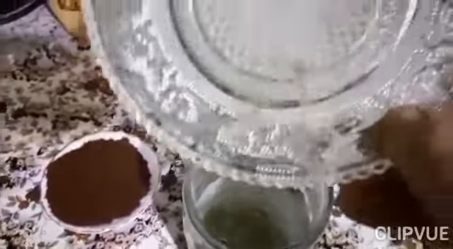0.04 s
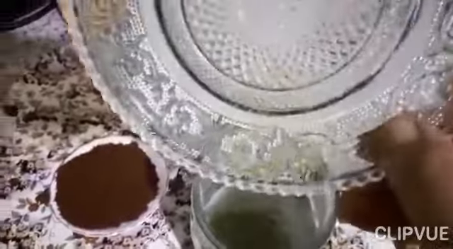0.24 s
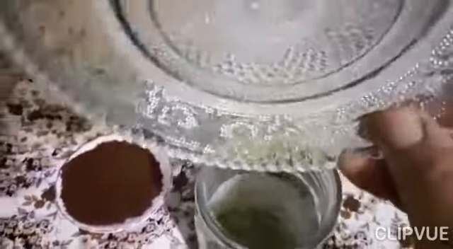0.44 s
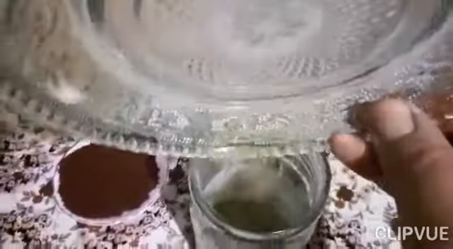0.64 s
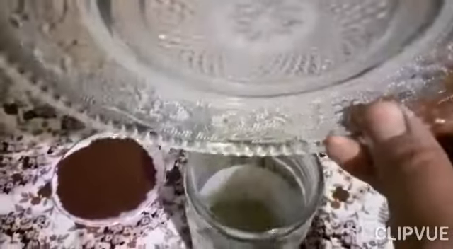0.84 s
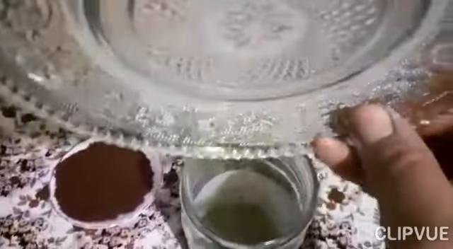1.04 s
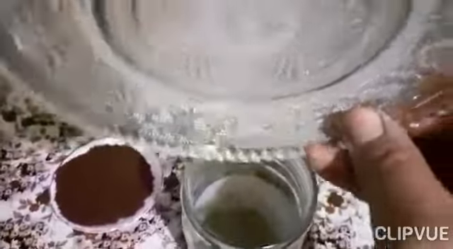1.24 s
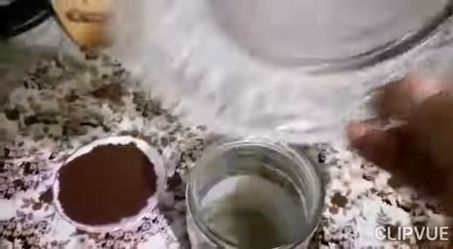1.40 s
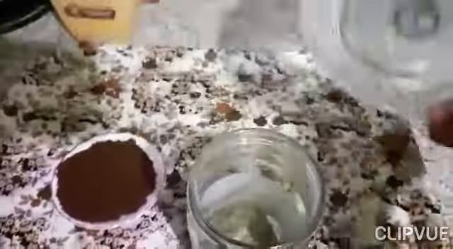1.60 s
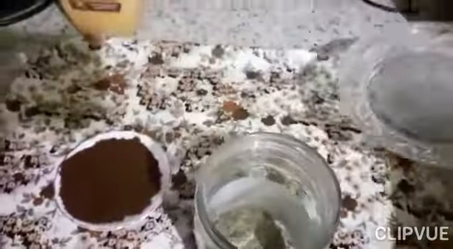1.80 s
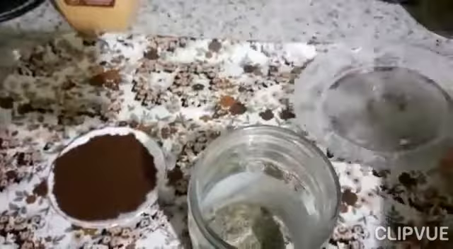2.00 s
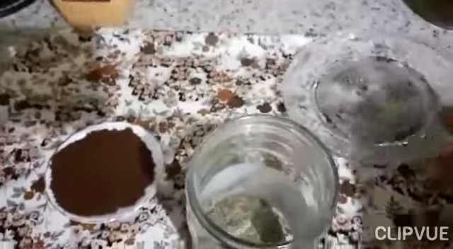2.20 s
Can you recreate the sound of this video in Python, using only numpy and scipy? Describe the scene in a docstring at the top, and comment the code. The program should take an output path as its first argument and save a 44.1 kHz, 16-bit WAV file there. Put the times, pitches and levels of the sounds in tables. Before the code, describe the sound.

Glass lid clinking on a glass jar, close up in a small kitchen with short echo. A sharp knock at 0.17 s, small taps until 0.47, then strong bouncing clinks near 0.64, 0.82, 0.95, 1.14 and 1.33, the last ringing on briefly. Faint hiss near 1.27, then almost quiet with tiny puffs. At 2.1 the lid lands on stone with a dull clack and settles.

```python
"""Glass lid on a jar

A hand-held glass lid knocks, often bouncing, on the rim of an open glass jar in a small kitchen; then it is
set down on a stone counter with a dull clack. Glass is decaying sine modes; cracks, thuds and clack are noise
bursts. Two tones ring on as the lid springs clear. Faint swells of band noise lie between the blows, over a
faint background noise."""
import sys
import numpy as np
from scipy import signal
from scipy.fft import irfft
from scipy.io import wavfile

SR = 44100
rng = np.random.default_rng(int(sys.argv[2]) if len(sys.argv) > 2 else 0)


def log_audio(samples):
    """Write samples as a 16-bit WAV file to the path given in sys.argv[1]."""
    # one column per channel
    frames = np.atleast_2d(samples).T
    # limit to full scale, then quantise
    limited = np.clip(frames, -1, 1)
    pcm = np.round(limited * 32767).astype(np.int16)
    wavfile.write(sys.argv[1], SR, pcm)


N = 99269
T = np.arange(N) / SR


def from_db(db):
    """Decibels to amplitude gain."""
    return 10 ** (np.asarray(db) / 20)


def at_hz(points, hz):
    """Interpolate a (freq_hz, value) table on a log-frequency axis."""
    freq_hz, value = np.transpose(points)
    return np.interp(np.log(np.maximum(hz, 1)), np.log(freq_hz), value)


def pan(left_minus_right_db):
    """Left and right gains of constant total power."""
    gains = from_db(np.array([left_minus_right_db, -left_minus_right_db]) / 2)
    return gains / np.sqrt(np.mean(gains ** 2, axis=0))


# likeness of the two ears' noise: freq_hz, correlation [-1..1]
EAR_LIKENESS = [(50, 0.8), (250, 0.99), (700, .75), (1300, 0.11), (3000, 0), (12000, 0)]


def noise(spectrum, balance):
    """Stereo noise of rms 1: random phases under a set colour, alike in both ears in the bass."""
    hz = np.arange(N // 2 + 1) * SR / N
    mid, side = np.exp(2j * np.pi * rng.random((2, len(hz))))
    alike = np.clip(at_hz(EAR_LIKENESS, hz), -1, 1)
    both = np.sqrt(1 + alike) * mid + np.sqrt(1 - alike) * side * [[1], [-1]]
    colour = from_db(at_hz(spectrum, hz)) * (hz > 20)
    x = irfft(both * colour * pan(at_hz(balance, hz)), N)
    return x / x.std()


def decay(start_s, t60_s, rise_s=1e-5):
    """Envelope: exponential rise towards 1 times a decay of 60 dB per t60."""
    age_s = np.maximum(T - start_s, 0)
    rise = 1 - np.exp(-age_s / rise_s)
    return rise * from_db(-60 * np.minimum(age_s / t60_s, 10))


# echo decay time: freq_hz, t60_s
ECHO_T60 = [(100, 0.6), (600, 0.34), (5000, 0.42), (13000, 0.3)]
# echo colour: freq_hz, level_db
ECHO_COLOUR = [(160, 4.5), (220, -4), (320, 3.5), (600, 2), (2000, -0.5), (5000, -6), (13000, -0.5)]
# echo balance: freq_hz, left_minus_right_db
ECHO_BALANCE = [(200, -0.5), (1500, -3.5), (3000, -5.5), (6000, 4.5), (12000, -3)]
ECHO_BUILD_S = 0.002


def kitchen():
    """Diffuse room echo: noise that builds up, then dies octave by octave at its own rate."""
    rest = noise(ECHO_COLOUR, ECHO_BALANCE)
    echo = 0
    for hz in 125 * 2 ** np.arange(8):
        low_pass = signal.butter(2, hz * 1.3, fs=SR, output="sos")
        band = signal.sosfiltfilt(low_pass, rest)
        rest = rest - band
        echo = echo + band * decay(0, at_hz(ECHO_T60, hz))
    echo = echo * (1 - np.exp(-T / ECHO_BUILD_S))
    return echo[:, :SR * 3 // 4]


def in_room(x, echo, wet_db):
    """Add the echo at a set level relative to the direct sound's rms."""
    wet = signal.fftconvolve(x, echo, axes=1)[:, :N]
    return x + from_db(wet_db) * wet * x.std() / (wet.std() + 1e-20)


MODE_RISE_S, MODE_SCATTER_DB = 0.0014, 3  # scatter: standard deviation per strike


def ring(mode, starts_s, levels_db, shifts_percent=0, rise_s=MODE_RISE_S):
    """One damped sine mode, struck at each start, with its own level and phase lag between the ears."""
    hz, mode_db, t60_s, pan_db, lag_rad = mode
    out, t = np.zeros((2, N + SR)), T[:SR]
    envelope = decay(0, t60_s, rise_s)[:SR]
    pitches_hz = hz * (np.ones(len(starts_s)) + shifts_percent / 100)
    strikes_db = levels_db + MODE_SCATTER_DB * rng.standard_normal(len(starts_s))
    for start_s, pitch_hz, strike_db in zip(starts_s, pitches_hz, strikes_db):
        i = int(start_s * SR)
        tone = np.sin(2 * np.pi * pitch_hz * t - np.array([[0], [lag_rad]]))
        out[:, i:i + SR] += tone * envelope * from_db(strike_db + mode_db)
    return out[:, :N] * pan(pan_db)[:, None]


# balance of the noise bursts: freq_hz, left_minus_right_db
BURST_BALANCE = [(100, 1), (600, -2), (1500, 1.5), (3000, 0), (4800, -7.5), (7600, -6.5), (8700, 17),
                 (13000, 15)]


def bursts(starts_s, levels_db, spectrum, t60_s, rise_s):
    """Modes too dense to tell apart: a dying noise burst per blow."""
    blows = zip(starts_s, levels_db)
    envelope = sum(from_db(level_db) * decay(start_s, t60_s, rise_s) for start_s, level_db in blows)
    return noise(spectrum, BURST_BALANCE) * envelope


# background colour: freq_hz, level_db_per_hz (relative)
BACKGROUND_COLOUR = [(25, -11.5), (87, 3), (247, -10), (384, -0.5), (524, -8), (859, -3.5), (1090, -15),
                     (1650, -9.5), (1970, -18.5), (3500, -20), (6360, -11), (15000, -27.5)]
# background balance, shared by the faint swells: freq_hz, left_minus_right_db
BACKGROUND_BALANCE = [(100, -3.5), (600, -2.5), (1500, -3.5), (6000, -10.5), (9000, 12), (14000, 2.5)]
# background level: time_s, level_db
BACKGROUND_LEVEL = [(0, -60), (.6, -58.5), (1.3, -55.5), (1.5, -63.5), (2.05, -65.5), (2.25, -61)]


def background():
    """Faint rumble and hiss: coloured noise whose level drifts."""
    level_db = np.interp(T, *np.transpose(BACKGROUND_LEVEL))
    return from_db(level_db) * noise(BACKGROUND_COLOUR, BACKGROUND_BALANCE)


# lid meets jar: start_s, body_shift_percent, crack_db, thud_db, then one level_db per mode family:
# low_body_db, upper_body_db, first_ring_db, second_ring_db, bright_db, high_db, top_db
JAR_KNOCKS = [(.1688, 0.5, -16, -53.5, -23.5, -20, -29, -14, -17, -7.5, -14),
              (.215, -1.5, -32, -49.5, -38, -39.5, -33, -47.5, -34, -36, -44),
              (.346, 0.5, -48.5, -58.5, -41.5, -44, -61, -45.5, -49, -46.5, -53),
              (.4304, 4, -45.5, -61.5, -39.5, -39, -49, -51, -42, -35.5, -46),
              (.4653, 2.5, -39.5, -68, -45.5, -42, -50, -64.5, -41, -35.5, -36.5),
              (.6415, -3.5, -19, -33, -20.5, -24, -22.5, -37, -20.5, -13.5, -11),
              (.6705, -1, -24, -37.5, -28.5, -32, -36, -49.5, -41, -28.5, -34),
              (.8158, 0.5, -16, -34, -17.5, -17.5, -11.5, -16.5, -10, -8, -11),
              (.8262, 1, -17.5, -32, -17, -23, -16, -36.5, -16, -11, -13.5),
              (.9545, 1.5, -18.5, -28, -24, -26, -16.5, -27, -25, -20, -15),
              (.9748, 1.5, -22.5, -28, -23, -20.5, -30.5, -40, -26, -20, -22),
              (1.1425, -1.5, -14, -29.5, -20.5, -17.5, -20.5, -26, -8.5, -10, -16),
              (1.1555, -1, -23.5, -41.5, -18.5, -23, -14.5, -26.5, -14, -21, -16.5),
              (1.3268, 0.5, -12.5, -25.5, -16.5, -17, -14.5, -12.5, -9.5, -4.5, -17.5),
              (1.340, 0.5, -27.5, -35.5, -36, -28.5, -24.5, -31, -8, -11.5, -18),
              (1.348, 0, -31.5, -42, -29.5, -31.5, -23.5, -34, -25, -19.5, -22)]
# modes of jar and lid together: pitch_hz
JAR_MODE_HZ = [296, 480, 552, 604, 748, 782, 1266, 1365, 1895, 1990, 2918, 2970, 3208, 4938, 5026, 5918,
               7355, 7660, 8880, 9912, 10440, 12235, 13250, 14035]
# same order: level_db (added to the family's), t60_s, left_minus_right_db, right_ear_lag_rad
JAR_MODES = [(-11.5, 0.11, -1, 0.49), (-7, 0.022, -3.5, 0.18), (-3.5, 0.048, 9, 0.24), (-3, 0.14, 1, 1.3),
             (-6.5, 0.085, 3, .2), (-8.5, 0.076, 6, 0.17), (-0.5, 0.059, 6.5, 2.2), (-5.5, 0.068, 1, 0.87),
             (-4, 0.053, 10, 0.53), (-8, 0.059, 9, 1.3), (-1, 0.1, 8.5, 1.54), (-8.5, 0.065, -11.5, 5.1),
             (1.5, 0.16, 1, 1.91), (5, 0.028, 3.5, 0.2), (-4, 0.21, -8, 2.3), (-5, 0.046, -18, 9.7),
             (-9, 0.038, -1, 1.8), (-17.5, 0.074, -7.5, 0.94), (-13.5, 0.036, 20, 1),
             (-25.5, 0.11, 19.5, 1.7), (-18, 0.042, 21.5, 1), (-30, .1, 0.5, 1.8), (-17.5, 0.047, 2.5, 1.5),
             (-31, 0.086, 0.5, 1.3)]
# borders between the mode families: edge_hz
FAMILY_BORDERS_HZ = [700, 2500, 3100, 4000, 5500, 8000]
# echo relative to each mode: freq_hz, echo_db
MODE_ECHO = [(300, -11.5), (600, -6), (2000, -18.5), (2900, -11.5), (3300, -14.5), (5000, -14.5),
             (13000, -12)]
# crack of the contact: freq_hz, level_db_per_hz (relative)
CRACK_COLOUR = [(150, -23.5), (300, -6.5), (450, -4.5), (650, 11), (940, -2), (1350, 3.5), (2000, 6),
                (2400, 0.5), (2800, 11), (3700, -2.5), (4500, 0.5), (5200, 6), (6400, 0), (7400, -2.5),
                (8300, -19), (10300, -8.5), (11500, -32.5), (12500, -28.5), (13200, -6), (14000, -26.5),
                (14800, -49.5)]
CRACK_T60_S, CRACK_RISE_S, CRACK_ECHO_DB = 0.059, 0.0014, -9.5
# the jar's weight bumps the counter: freq_hz, level_db_per_hz (relative)
THUD_COLOUR = [(40, -20), (110, -24), (170, -1.5), (380, -5), (600, -3), (1500, -37)]
THUD_T60_S, THUD_RISE_S, THUD_ECHO_DB = 0.059, 0.0014, -7


def clinks(echo):
    """Knock: crack, thud and glass modes; the contact sets the family levels and detunes the body."""
    starts_s, shifts_percent, crack_db, thud_db, *family_db = np.transpose(JAR_KNOCKS)
    crack = bursts(starts_s, crack_db, CRACK_COLOUR, CRACK_T60_S, CRACK_RISE_S)
    thud = bursts(starts_s, thud_db, THUD_COLOUR, THUD_T60_S, THUD_RISE_S)
    out = in_room(crack, echo, CRACK_ECHO_DB) + in_room(thud, echo, THUD_ECHO_DB)
    for hz, mode in zip(JAR_MODE_HZ, JAR_MODES):
        family = np.searchsorted(FAMILY_BORDERS_HZ, hz)
        body_shifts = shifts_percent * (family < 2)  # only the two body families shift
        tone = ring((hz, *mode), starts_s, family_db[family], body_shifts)
        out = out + in_room(tone, echo, at_hz(MODE_ECHO, hz))
    return out


# lid springs clear: start_s, first_mode_db, second_mode_db
FREE_STARTS = [(0.169, -44, -34.5), (0.6437, -28.5, -64), (1.3295, -14, -40.5)]
# the two undamped modes: pitch_hz
FREE_PITCHES_HZ = [2904, 3208]
# same order: level_db (added to the start's), t60_s, left_minus_right_db, right_ear_lag_rad
FREE_TONES = [(3, 0.43, -1, 1.6), (1.5, 0.49, -1, 2)]
FREE_RISE_S = 0.0043


def free_rings():
    """Undamped modes: pure tones that swell as the two glasses part, then die slowly."""
    starts_s, *mode_db = np.transpose(FREE_STARTS)
    out = 0
    for hz, mode, levels_db in zip(FREE_PITCHES_HZ, FREE_TONES, mode_db):
        out = out + ring((hz, *mode), starts_s, levels_db, rise_s=FREE_RISE_S)
    return out


# lid glances off the rim: start_s, level_db
RIM_GLANCES = [(0.1703, -11), (1.145, -18.5), (1.33, -14)]
# rim modes: pitch_hz, level_db (added to the glance's), t60_s, left_minus_right_db, right_ear_lag_rad
RIM_MODES = [(5090, 0.5, 0.03, -19, 0.2), (5178, 6, .028, -13.5, 0.77), (5360, 0, 0.031, -5.5, 0.5)]


def rim_pings(echo):
    """Glancing blows excite short-lived bright rim modes."""
    starts_s, levels_db = np.transpose(RIM_GLANCES)
    pings = sum(ring(mode, starts_s, levels_db) for mode in RIM_MODES)
    return in_room(pings, echo, wet_db=-16.5)


# a broad high hiss, then narrow puffs: peak_s, length_s (peak to 1/e), centre_hz,
# width_octaves (centre to -6 dB), level_db
NOISE_SWELLS = [(1.268, 0.077, 6300, 0.75, -53.5), (1.672, .04, 1460, 0.24, -68),
                (1.708, 0.016, 5540, 0.22, -61), (2.022, 0.08, 3510, 0.036, -70.5),
                (2.025, 0.057, 780, 0.15, -64.5)]


def faint_swells():
    """Faint swells of band noise, Gaussian in time: a broad high hiss, then narrow puffs."""
    out = 0
    for peak_s, length_s, centre_hz, width_octaves, level_db in NOISE_SWELLS:
        band = [(centre_hz * 2 ** (width_octaves * k), -6 * k * k) for k in range(-4, 5)]
        swell = np.exp(-((T - peak_s) / length_s) ** 2)
        out = out + from_db(level_db) * swell * noise(band, BACKGROUND_BALANCE)
    return out


# lid lands and settles: start_s, level_db
COUNTER_LANDINGS = [(2.1032, -20), (2.120, -30.5), (2.131, -37.5), (2.230, -48.5)]
# lid lying on stone: pitch_hz, level_db (added to the landing's), t60_s, left_minus_right_db, right_ear_lag_rad
STONE_MODES = [(634, -2, 0.061, -1, 0.17), (746, 8.5, 0.039, 3.5, 0.46), (778.7, -9, 0.1, -4.5, 0.96),
               (1368, -21.5, 0.15, -11, 0.62)]
# clack: freq_hz, level_db_per_hz (relative)
CLACK_COLOUR = [(60, -60), (150, -1.5), (400, -12.5), (750, -5), (1400, -4), (2800, -14), (4200, -16),
                (6000, -16), (8500, -29.5), (12000, -39), (14500, -46)]
CLACK_T60_S, CLACK_RISE_S, LANDING_ECHO_DB = 0.07, 0.001, -6.5
# first touch of glass on stone: freq_hz, level_db_per_hz (relative)
TICK_COLOUR = [(2500, -9), (5000, 10), (9000, -47), (14500, -36)]
TICK_DB, TICK_T60_S = -3.5, 0.031  # level relative to the landing


def set_down(echo):
    """Stone damps the lid to a low clack: short modes, a tick and a noise burst per landing."""
    starts_s, levels_db = np.transpose(COUNTER_LANDINGS)
    body = sum(ring(mode, starts_s, levels_db) for mode in STONE_MODES)
    tick = bursts(starts_s, levels_db + TICK_DB, TICK_COLOUR, TICK_T60_S, rise_s=1 / SR)
    clack = bursts(starts_s, levels_db, CLACK_COLOUR, CLACK_T60_S, CLACK_RISE_S)
    return in_room(body + tick + clack, echo, LANDING_ECHO_DB)


def scene():
    """Knocks, then the landing, in one room."""
    echo = kitchen()
    knocks = clinks(echo) + free_rings() + rim_pings(echo)
    return background() + knocks + faint_swells() + set_down(echo)


LOW_CUT_HZ, OVERLOAD, CUTOFF_HZ = 39, 1, 15600  # overload: full-scale amplitude of the rounding


def record(dry):
    """Thin the deep bass, round the loudest peaks (tanh), cut the top."""
    high_pass = signal.butter(2, LOW_CUT_HZ, "high", fs=SR, output="sos")
    thinned = signal.sosfilt(high_pass, dry)
    rounded = OVERLOAD * np.tanh(thinned / OVERLOAD)
    low_pass = signal.cheby2(12, 60, CUTOFF_HZ, fs=SR, output="sos")
    return signal.sosfilt(low_pass, rounded)


dry = scene()
out = record(dry)
log_audio(out)
```